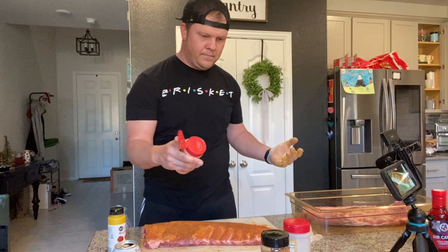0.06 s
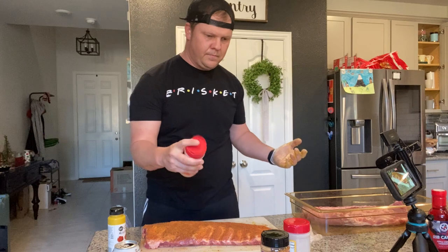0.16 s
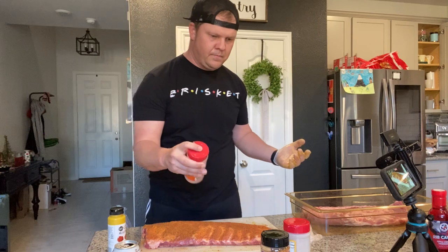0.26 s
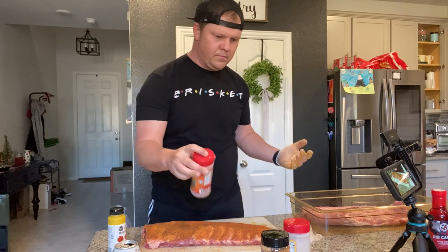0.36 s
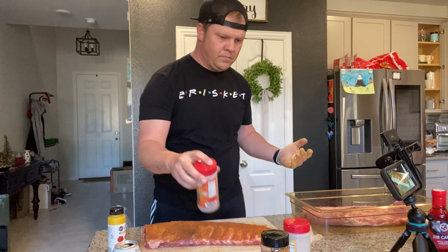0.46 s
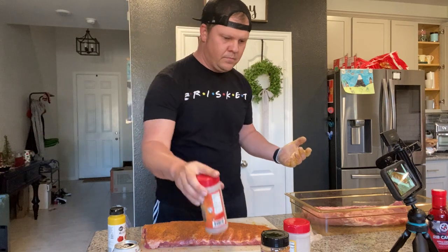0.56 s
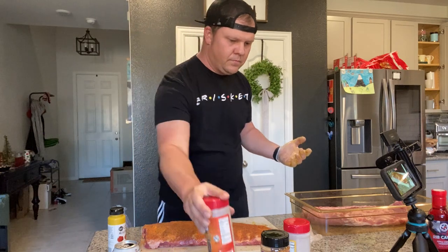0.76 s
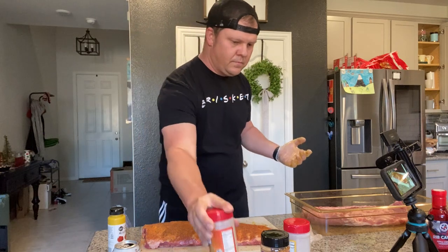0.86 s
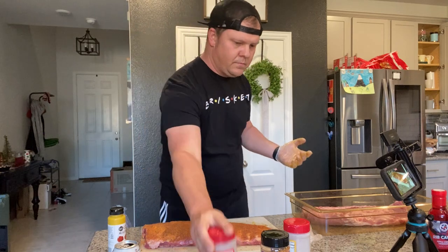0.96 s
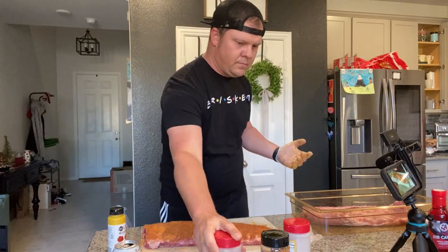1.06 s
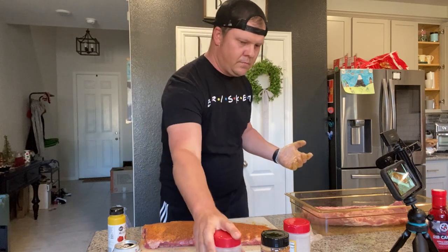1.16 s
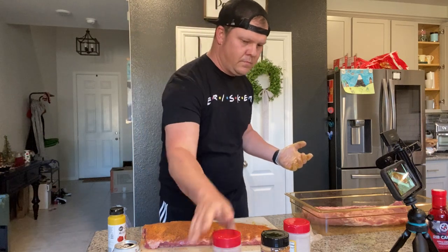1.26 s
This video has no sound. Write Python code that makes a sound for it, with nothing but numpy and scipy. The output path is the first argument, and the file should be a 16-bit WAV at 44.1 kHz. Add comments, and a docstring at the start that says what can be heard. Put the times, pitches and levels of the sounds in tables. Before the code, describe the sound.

Sharp snap of a plastic spice jar lid, faint rattly ticks, then a knock on a kitchen counter

```python
"""The plastic lid of a spice shaker snaps shut in a kitchen: a short rub, then cracks and ringing plastic.
Light ticks of the handled jar follow, made of short rings and gritty noise.
The jar lands with a knock of decaying tones and noise, a low thud and a soft boom.
Echoes and a noise tail make the hard room ring; an appliance hums in soft, steady air noise."""
import sys
import numpy as np
from scipy import signal
from scipy.fft import rfft, irfft, next_fast_len
from scipy.io import wavfile

SR = 44100
rng = np.random.default_rng(int(sys.argv[2]) if len(sys.argv) > 2 else 0)


def generate_wav(sig):
    """Save sig (samples, or channels by samples) to the path in sys.argv[1] as 16-bit PCM at SR."""
    pcm = np.round(np.clip(np.atleast_2d(sig).T, -1, 1) * 32767).astype(np.int16)
    wavfile.write(sys.argv[1], SR, pcm)


N = 57330  # length of the scene in samples, 1.3 s
SOUND_S = 0.3  # longest single ring, burst or boom, in seconds

# Slips of the lid's lip over the catch until it seats. Each row: start in seconds, level in dB.
SNAP_SLIPS = [(0.217, -16), (0.2194, -16), (0.2204, -1)]
# Lid and jar ringing together. Each row: pitch in Hz, peak level in dB, time to fall 60 dB in seconds.
LID_MODES = [(125, 7, 0.029), (203.5, 25, 0.048), (273, 24.5, 0.36), (361, 18, 0.019), (655, 12.5, 0.01),
             (846, 14, 0.013), (1149.5, 22, 0.015), (1415, 20, 0.02), (1703, 18.5, 0.04), (1884, 16, 0.033),
             (2213, 17, 0.013), (2855, 11, .014), (3280, 11, 0.013), (3660, 20, .018), (5070, 11, 0.016),
             (8600, 1, 0.015)]
# Colour of the catch's crack. Each row: frequency in Hz, gain in dB.
CRACK_COLOUR = [(100, 8), (400, 12.5), (1500, 12), (4000, -1), (6200, 8), (7500, 5.5), (9000, 11.5),
                (11500, 1), (13500, -7.5), (16000, -36)]
CRACK_DECAY_S = 0.012
# Colour of the lip rubbing before the catch gives. Each row: frequency in Hz, gain in dB.
RUB_COLOUR = [(200, 2), (900, -23), (1900, -3.5), (3000, -23.5), (7000, -21), (9000, -43), (16000, -58)]
RUB_START_S, RUB_END_S = 0.203, 0.219
LID_LOW_HZ = 127  # the snap carries little below this


def lid():
    """The lip rubs harder and harder, then each slip of the catch cracks and rings the lid."""
    out = np.zeros(N)
    body = ring(LID_MODES)
    for start_s, db in SNAP_SLIPS:
        crack = colour(burst(CRACK_DECAY_S), CRACK_COLOUR)
        add(out, start_s, amp(db) * (body + crack))
    t = np.arange(N) / SR
    rub_power = np.interp(t, [RUB_START_S, RUB_END_S], [0, 1], right=0)
    rub = rng.standard_normal(N) * np.sqrt(rub_power)
    rub /= np.linalg.norm(rub)  # unit energy
    return low_cut(out + colour(rub, RUB_COLOUR), LID_LOW_HZ)


# Small ticks of the handled shaker. Each row: start in seconds, then gain in dB in each band below.
HANDLING_TICKS = [(0.4461, -4.5, -2, -13, -7.5, -11, -12.5, -20.5),
                  (.5850, -4, -16, -20, -11.5, -13.5, -31, -23.5),
                  (0.6583, -5.5, -1.5, 5, 0, -2, -7.5, -13.5), (.7254, -5.5, 5, 6.5, 1, -8, -6, -12),
                  (0.7726, 1, 3, 17, 5, -10, -5.5, -13.5), (0.7995, -3.5, -10.5, 6, 6.5, 3, 2.5, 0),
                  (0.8567, -30, -34, -2.5, -6, -25, -11, -6),
                  (1.0035, -24, -11, -13, -12, -23, -17.5, -36.5),
                  (1.236, -4.5, -16, -20, -20, -25, -32, -44)]
# Frequencies of those gains, in Hz.
TICK_COLOUR_HZ = [400, 750, 1500, 2400, 3600, 6000, 10000]
# Jar wall under a light touch, before each tick's own colour.
# Each row: pitch in Hz, peak level in dB, time to fall 60 dB in seconds.
WALL_MODES = [(370, 2, 0.0067), (1080, -6, 0.0044), (1424, 1.5, 0.009), (1710, -2, 0.0064),
              (2574, -1.5, 0.0044), (3520, 3, 0.0063), (4850, -1.5, 0.0025), (7300, -6.5, 0.001),
              (8760, -3, 0.0019), (11000, -24, 0.0021)]
# Gritty part of each touch, before the tick's own colour. Each row: frequency in Hz, gain in dB.
GRIT_COLOUR = [(200, -21), (1500, -6), (4000, -21.5), (8000, -1.5), (12000, -10), (16000, -30)]
GRIT_DECAY_S = 0.02
TICK_LOW_HZ = 173  # light touches carry no deep bass


def handling():
    """Light touches ring the jar wall and add grit, each tick with its own colour."""
    out = np.zeros(N)
    body = ring(WALL_MODES)
    for start_s, *band_db in HANDLING_TICKS:
        touch = body + colour(burst(GRIT_DECAY_S), GRIT_COLOUR)
        tick_colour = list(zip(TICK_COLOUR_HZ, band_db))
        add(out, start_s, colour(touch, tick_colour))
    return low_cut(out, TICK_LOW_HZ)


# The base lands on its edge, then settles flat.
# Each row: start in seconds, knock level in dB, thud level in dB.
LANDING_HITS = [(1.0226, -0.5, -10.5), (1.0280, -45, -0.5)]
# Base of the jar. Each row: pitch in Hz, peak level in dB, time to fall 60 dB in seconds.
BASE_MODES = [(543, 8, .04), (728, 18, 0.11), (950, 16, 0.02), (1190, 16, 0.021), (1990, -1, 0.005),
              (2950, 11.5, 0.024), (3330, -2.5, 0.022), (3960, 4.5, 0.012), (5400, 10.5, 0.02),
              (6870, 7.5, 0.019)]
# Counter and filled jar. Each row: pitch in Hz, peak level in dB, time to fall 60 dB in seconds.
COUNTER_MODES = [(118.4, 36.5, 0.32), (181, 19, 0.07), (270, 20.5, 0.049), (404.4, 17, 0.035)]
# Powder jolting and settling. Each row: frequency in Hz, gain in dB.
POWDER_COLOUR = [(200, -6.5), (1000, 8), (2000, -6), (3300, 5), (7000, -2), (10000, -14), (13000, -29.5),
                 (16000, -20)]
# Click of plastic on stone. Each row: frequency in Hz, gain in dB.
CONTACT_COLOUR = [(200, 15), (1500, -7), (5000, -3), (8000, -1.5), (11500, -8), (16000, -29)]
POWDER_DECAY_S, CONTACT_DECAY_S = 0.18, 0.011
THUD_LOW_HZ = 73.5  # lower edge of the thud


def landing():
    """The base rings and clicks, the powder jolts and the heavy counter thuds."""
    out = np.zeros(N)
    base = ring(BASE_MODES)
    thud = ring(COUNTER_MODES)
    for start_s, knock_db, thud_db in LANDING_HITS:
        contact = colour(burst(CONTACT_DECAY_S), CONTACT_COLOUR)
        powder = colour(burst(POWDER_DECAY_S), POWDER_COLOUR)
        knock = base + contact + powder
        add(out, start_s, amp(knock_db) * knock + amp(thud_db) * thud)
    return low_cut(out, THUD_LOW_HZ)


BOOM_HZ, BOOM_DB, BOOM_RISE_S = 59.8, -45, 0.095  # pitch, rms level at its height, time to its height


def boom():
    """A soft low tone starts at the landing, swells and sinks again."""
    out = np.zeros(N)
    t = np.arange(0, SOUND_S, 1 / SR)
    swell = (t / BOOM_RISE_S * np.exp(1 - t / BOOM_RISE_S)) ** 7
    tone = np.sqrt(2) * amp(BOOM_DB) * np.sin(2 * np.pi * BOOM_HZ * t)
    add(out, LANDING_HITS[0][0], swell * tone)
    return out


# Dull echoes from the walls and the ceiling. Each row: delay in seconds, level in dB.
WALL_ECHOES = [(.0115, -12.5), (.0225, -12.5), (.0305, -11)]
# Colour of those echoes. Each row: frequency in Hz, gain in dB.
ECHO_TONE = [(100, -3.5), (230, 7.5), (450, -7), (1000, -11), (3000, -8), (12000, -20)]


def echoes(x):
    """A few distinct, bass-heavy reflections: delayed, dulled copies."""
    out = np.zeros(N)
    dull = colour(x, ECHO_TONE)
    for delay_s, db in WALL_ECHOES:
        add(out, delay_s, amp(db) * dull)
    return out


# Colour of the room's tail. Each row: frequency in Hz, level in dB.
TAIL_COLOUR = [(60, -1.5), (250, -4), (500, -2), (1100, -6.5), (1600, -6), (2300, 0.5), (3800, -5.5),
               (7000, -4.5), (9300, -9), (11500, -6), (15000, -11)]
# How long the tail rings. Each row: frequency in Hz, time to fall 60 dB in seconds.
TAIL_DECAY = [(100, .35), (400, 0.37), (1100, 0.72), (2700, 0.53), (7000, 0.56), (13000, 0.31)]
TAIL_RISE_S = 0.021  # time for the tail to build up
# Scatter from nearby surfaces: level in dB, decay, first arrival, and lowest frequency of small surfaces.
NEAR_DB, NEAR_DECAY_S, NEAR_DELAY_S, NEAR_LOW_HZ = -8, 0.056, 0.005, 424


def kitchen(x):
    """Quick scatter from nearby surfaces and a noise tail that dies at its own speed at each pitch."""
    noise = rng.standard_normal((2, SR // 2))
    hz, frame_s, spectrum = signal.stft(noise, SR, nperseg=256)
    t60 = read(TAIL_DECAY, hz)[:, None]
    unit_energy = np.sqrt(2 * np.log(1000) / (t60 * SR))
    tails = signal.istft(spectrum * fade(frame_s, t60) * unit_energy, SR, nperseg=256)[1]
    rise = np.minimum(np.arange(tails.shape[1]) / SR / TAIL_RISE_S, 1)
    tails = [colour(tail * rise, TAIL_COLOUR) for tail in tails]
    for tail in tails:
        scatter = low_cut(burst(NEAR_DECAY_S), NEAR_LOW_HZ)
        add(tail, NEAR_DELAY_S, amp(NEAR_DB) * scatter)
    return signal.fftconvolve(x[None], pair(*tails), axes=1)[:, :N]


# Appliance hum. Each row: pitch in Hz, rms level in dB before the waver.
HUM_TONES = [(60, -71), (120, -46), (245, -59)]
HUM_WAVER = 0.13  # depth of the waver, as a share of the tone


def hum():
    """Mains hum of an appliance: steady tones, each wavering slightly in level and phase."""
    t = np.arange(N) / SR
    out = np.zeros(N)
    for hz, db in HUM_TONES:
        waver_hz = rng.uniform(-8, 9.57, size=8)
        waver = sum(np.exp(2j * np.pi * (f * t + rng.random())) for f in waver_hz) / np.sqrt(8)
        tone = np.exp(2j * np.pi * (hz * t + rng.random()))
        out += np.sqrt(2) * amp(db) * ((1 + HUM_WAVER * waver) * tone).real
    return out


# Colour of the steady air noise. Each row: frequency in Hz, relative level in dB.
AIR_COLOUR = [(25, -18.5), (55, 5), (90, -3.5), (185, -7), (280, 1), (400, -11.5), (650, -4.5),
              (1100, -17.5), (2000, -28), (3300, -24), (6000, -28.5), (8500, -33), (12000, -46.5),
              (14000, -64)]
AIR_DB = -54  # rms level of the whole noise


def air():
    """Soft steady ventilation noise, spread over both microphones."""
    noises = [colour(noise, AIR_COLOUR, size=4096) for noise in rng.standard_normal((2, N))]
    x = pair(*noises)
    return amp(AIR_DB) * x / x.std()


# How alike diffuse sound is at the two microphones.
# Each row: frequency in Hz, likeness from 0 (unrelated) to 1 (identical).
MICROPHONE_LIKENESS = [(50, 0.77), (200, 0.69), (450, 0.22), (1000, 0.05), (3000, 0.071), (6000, 0.065),
                       (8000, 0.64), (10000, 1), (12000, 0.63)]


def pair(a, b):
    """Two unrelated noises become the diffuse sound at the two microphones."""
    def likeness(hz):
        """Share of the sound the two microphones have in common."""
        return np.clip(read(MICROPHONE_LIKENESS, hz), 0, 1)
    mid = filtered(a, lambda hz: np.sqrt((1 + likeness(hz)) / 2))
    side = filtered(b, lambda hz: np.sqrt((1 - likeness(hz)) / 2))
    return np.array([mid + side, mid - side])


SPREAD_S = 0.000685  # bending waves: how late 1 kHz arrives; lower tones come later


def ring(modes):
    """Struck modes, each with its resonance peak at the given level; low tones arrive later."""
    t = np.arange(0, SOUND_S, 1 / SR)
    out = np.zeros(len(t))
    for k, (hz, db, t60) in enumerate(modes):
        gain = amp(db) * 2 * np.log(1000) / (t60 * SR)
        sign = (-1) ** k  # neighbouring modes start in opposite directions
        out += sign * gain * fade(t, t60) * np.sin(2 * np.pi * hz * t)
    return filtered(out, lambda hz: np.exp(-4j * np.pi * SPREAD_S * np.sqrt(1000 * hz)))


def burst(decay_s):
    """Dying noise of unit energy, evened out so that it favours no pitch."""
    envelope = fade(np.arange(0, SOUND_S, 1 / SR), decay_s)
    spectrum = rfft(rng.standard_normal(len(envelope)) * envelope)
    flat = irfft(spectrum / (abs(spectrum) + 1e-12), len(envelope))
    x = flat * np.sqrt(envelope)  # shortens the decay a little further
    return x / np.linalg.norm(x)


def fade(t, t60):
    """Exponential decay that falls 60 dB in t60 seconds."""
    return np.exp(-np.minimum(np.log(1000) * t / t60, 40))


def amp(db):
    """Decibels to gain."""
    return 10 ** (np.asarray(db) / 20)


def read(points, hz):
    """Reads a table on a log-frequency axis."""
    f, value = np.transpose(points)
    return np.interp(np.log(hz + 1), np.log(f + 1), value)


def add(mix, start_s, sound):
    """Mixes a sound in at a time, cutting it at the end of the mix."""
    part = mix[round(start_s * SR):][:len(sound)]
    part += sound[:len(part)]


def filtered(x, response):
    """Applies a frequency response, given as a function of Hz."""
    length = x.shape[-1]
    size = next_fast_len(length + SR // 20, True)  # spare room for late sound
    spectrum = rfft(x, size) * response(np.fft.rfftfreq(size, 1 / SR))
    return irfft(spectrum, size)[..., :length]


def colour(x, points, size=2048):
    """Minimum-phase filter through (Hz, dB) points: nothing sounds before its cause."""
    hz = abs(np.fft.fftfreq(size, 1 / SR))
    log_gain = np.log(amp(read(points, hz)))
    taps = np.fft.ifft(np.exp(np.conj(signal.hilbert(log_gain)))).real
    return signal.fftconvolve(x, taps)[:len(x)]


def low_cut(x, hz):
    """Steep high-pass that removes the bass below hz."""
    return signal.sosfilt(signal.butter(4, hz, "highpass", fs=SR, output="sos"), x)


def scene():
    """The shaker in the middle of the humming kitchen."""
    shaker = lid() + handling() + landing()
    room = echoes(shaker) + kitchen(shaker)
    return shaker + room + boom() + hum() + air()


# Phase between the microphone ports. Each row: frequency in Hz, lead of the left in radians.
LEFT_LEAD = [(100, 0.5), (400, -0.03), (1500, -1), (3800, -0.93), (6000, -1), (7800, -2.5), (9300, -3),
             (10300, -1.5), (11800, 0.5), (16000, 3.5)]
EDGE_HZ = 16500  # upper edge of the sound


def record(dry, size=2048):
    """Phase difference between the microphone ports, then the band limit."""
    padded = np.pad(dry, ((0, 0), (size, size)), "reflect", reflect_type="odd")
    ports = filtered(padded, lambda hz: np.exp(0.5j * np.outer([1, -1], read(LEFT_LEAD, hz))))
    band_limit = signal.firwin(511, EDGE_HZ, window=("kaiser", 9), fs=SR)
    return signal.oaconvolve(ports, band_limit[None], "same")[:, size:-size]


dry = scene()
out = record(dry)
generate_wav(out)
```